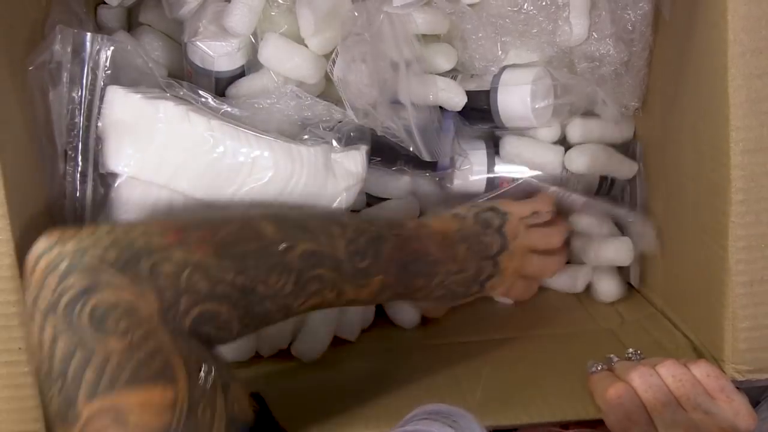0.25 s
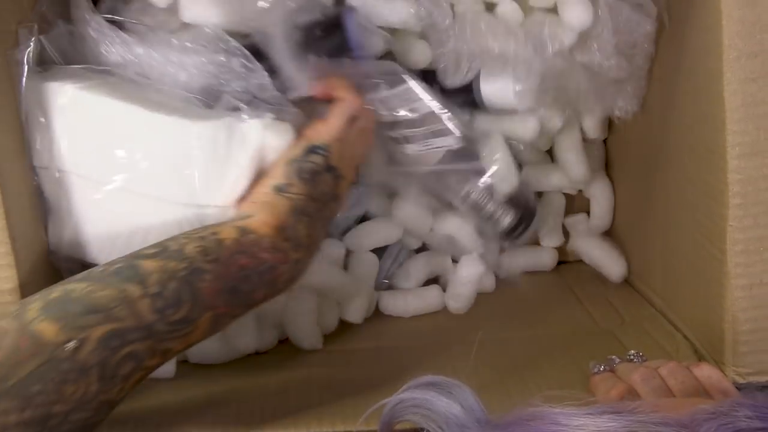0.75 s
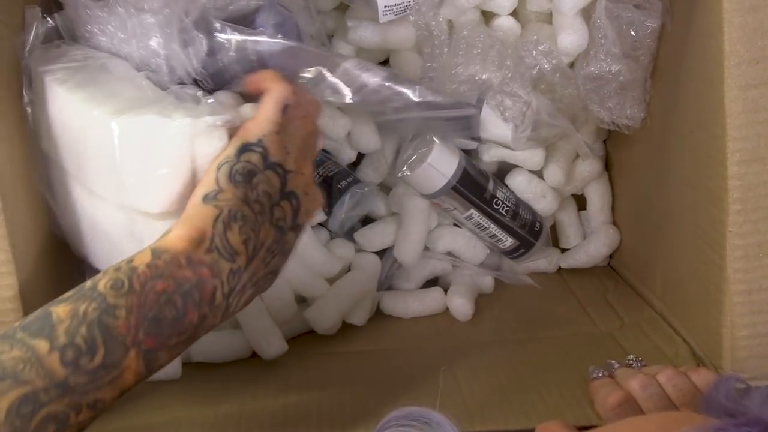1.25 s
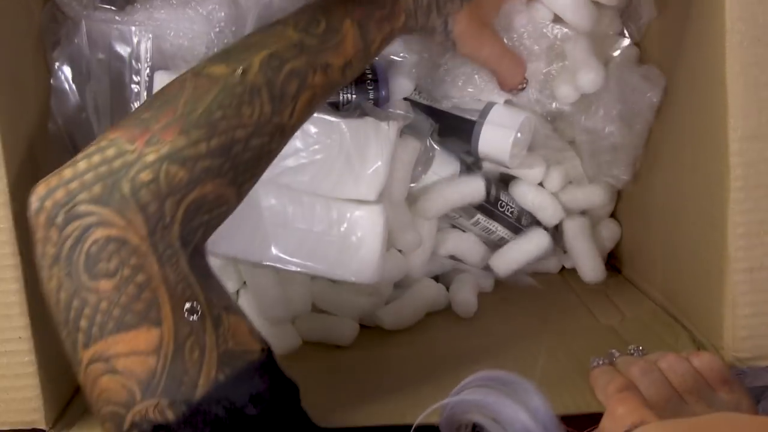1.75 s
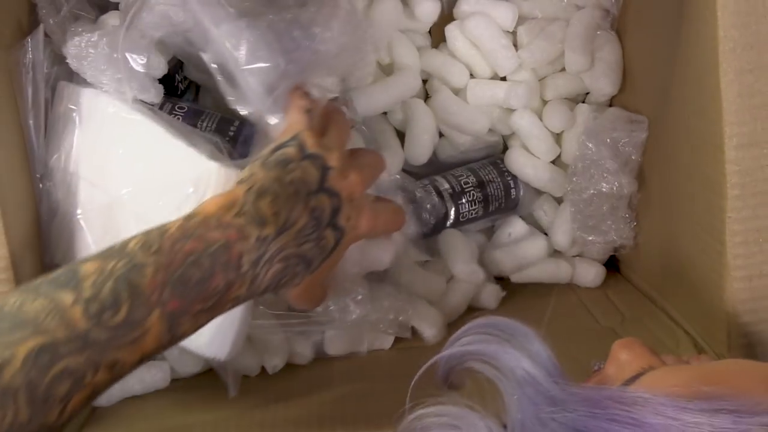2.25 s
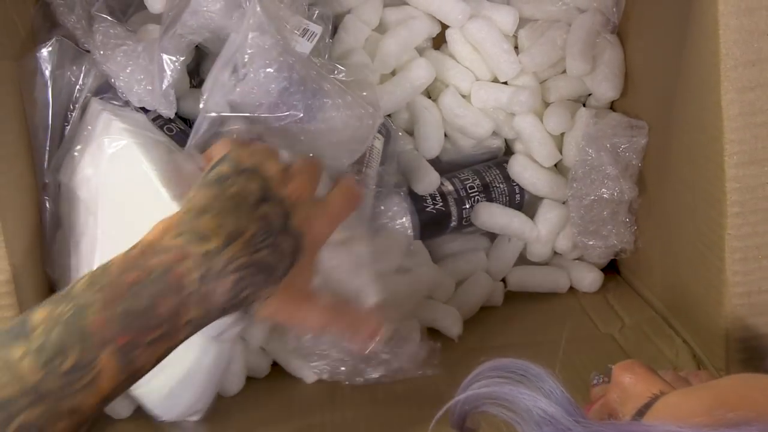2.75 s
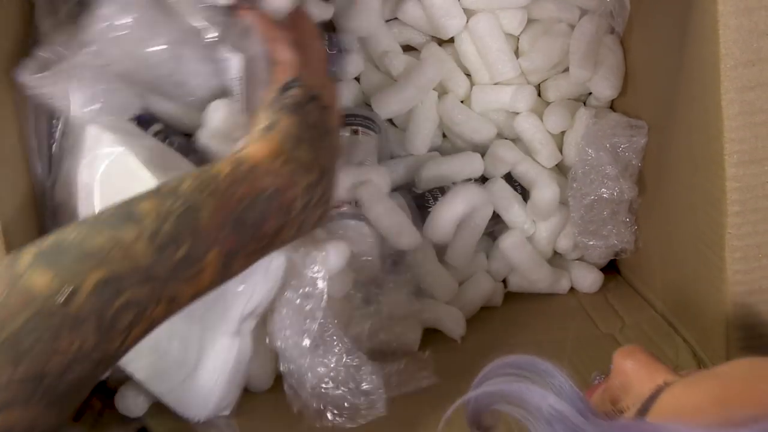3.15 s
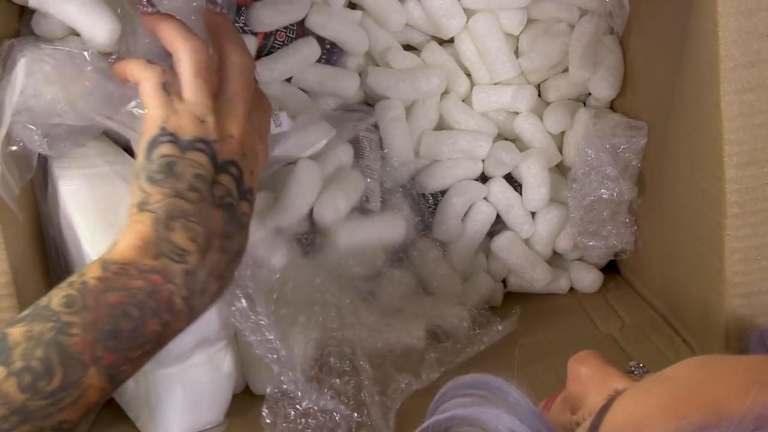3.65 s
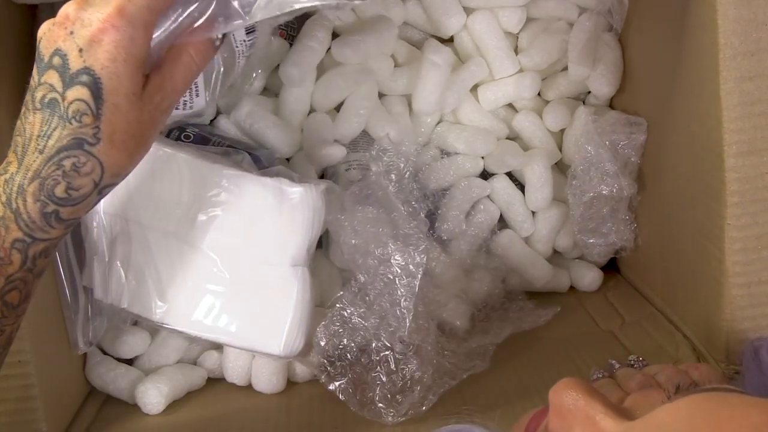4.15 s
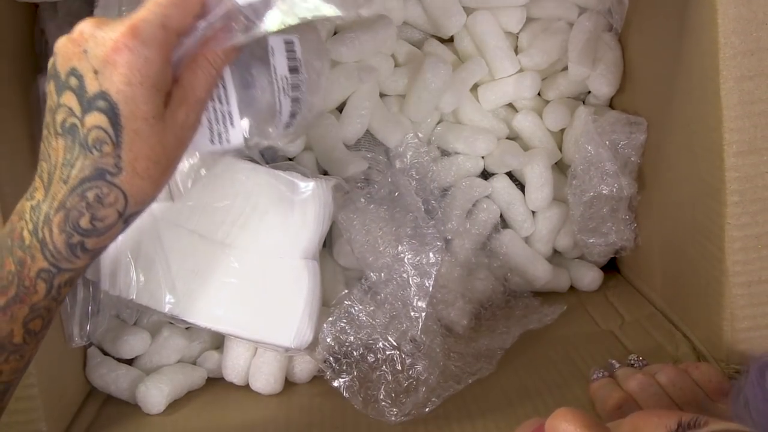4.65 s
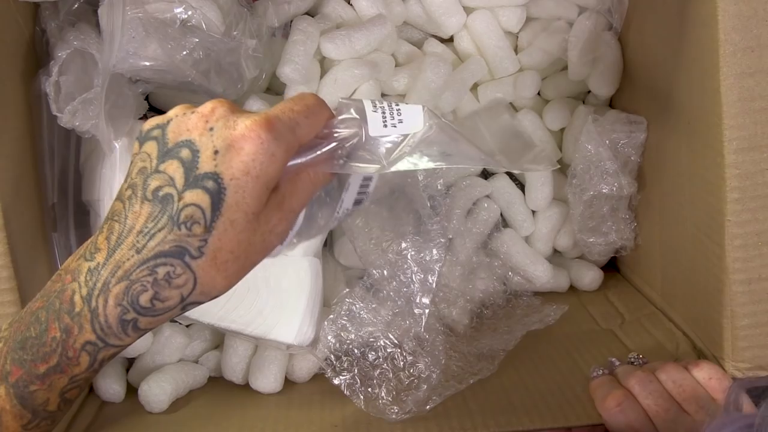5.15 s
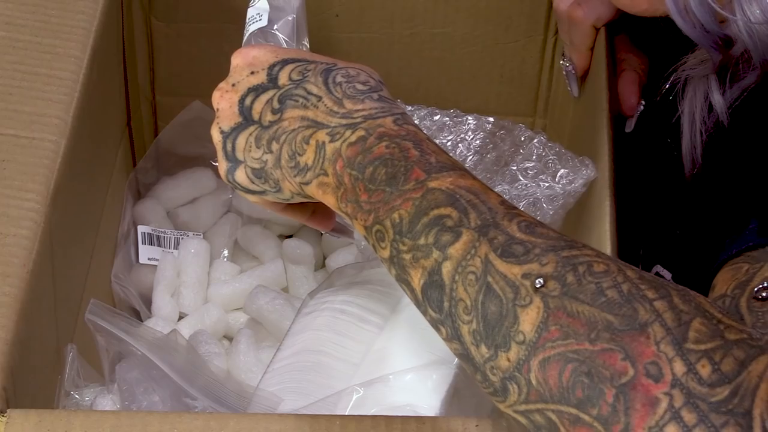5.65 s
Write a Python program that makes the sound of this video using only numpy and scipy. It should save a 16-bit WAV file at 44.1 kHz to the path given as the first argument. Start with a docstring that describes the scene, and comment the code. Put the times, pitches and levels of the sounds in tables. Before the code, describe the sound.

Close to the microphone, a plastic bag hisses briefly as it is dragged aside, then foam pieces rustle and tumble with a cardboard knock. A heavier multiple thump follows at about a second and a half, with low box rumble. Sharp film snaps continue, bunching densely past four seconds, before fading into a few faint crumples in a quiet room.

```python
"""A hand digs through a box of foam packing pieces, bubble wrap and plastic bags, close to the microphone.
First a bag is dragged aside with a fine hiss of rubbing contacts; then foam rustles in dense noise bursts,
film creases snap as sharp edges with ringing noise, and the box walls are knocked in low thud swings,
thickest around 1.6 s, while the box drums and sways. Near 4.9 s one bag is held up: its stiff folds crumple
in sparse ringing pops, and the sound dies away into a quiet, wavering room."""
import sys
import numpy as np
from scipy import signal
from scipy.fft import irfft
from scipy.io import wavfile
from scipy.ndimage import uniform_filter1d

SR = 44100
rng = np.random.default_rng(int(sys.argv[2]) if len(sys.argv) > 2 else 0)


def boost(x):
    """Linear amplitude factor 10**(x/20) for a level x in decibels (scalar or array-like)."""
    u = np.asarray(x, float) / 20
    return 10 ** u


def file_out(sig):
    """Save sig as 16-bit WAV at sys.argv[1]."""
    # one column per channel
    cols = np.atleast_2d(sig).T
    # limit, then scale
    lim = np.clip(cols, -1, 1)
    pcm = np.round(lim * 32767).astype(np.int16)
    wavfile.write(sys.argv[1], SR, pcm)


N = 260217  # samples, 5.9 s


def evened(x):
    """Scales to rms 1."""
    return x / np.sqrt(np.mean(x ** 2) + 1e-20)


def smooth_noise(samples):
    """Slow random wander of rms 1, averaged over this many samples."""
    return evened(uniform_filter1d(rng.standard_normal(N), samples))


def read(points, hz):
    """Reads a table over pitch on a log-frequency axis."""
    f, value = np.transpose(points)
    return np.interp(np.log(hz + 1), np.log(f + 1), value)


def add(mix, s, sound):
    """Mixes a sound in at a time."""
    part = mix[round(s * SR):][:len(sound)]
    part += sound[:len(part)]


def band(x, lo_hz, hi_hz):
    """Band-pass."""
    return signal.sosfilt(signal.butter(2, [lo_hz, hi_hz], "band", fs=SR, output="sos"), x)


def colour(x, points):
    """Filters x with the spectrum of a table."""
    hz = np.fft.rfftfreq(2048, 1 / SR)
    impulse = np.fft.fftshift(irfft(boost(read(points, hz))))
    return signal.oaconvolve(x, impulse, "same")


def patchy(x, patch_db, bins, frames):
    """Different pieces rub at different moments, so the colour drifts in patches."""
    z = signal.stft(x, nperseg=512)[2]
    field = rng.standard_normal(z.shape[::-1]).T
    field = uniform_filter1d(field, bins, axis=0)
    field = uniform_filter1d(field, frames, axis=1)
    return signal.istft(z * boost(patch_db * evened(field)), nperseg=512)[1][:N]


def ring(hz, t60, length):
    """A sine that dies by 60 dB in t60 seconds, cut off at length seconds."""
    t = np.arange(round(length * SR)) / SR
    return np.sin(2 * np.pi * hz * t) * boost(-60 * t / t60)


def contacts(per_s, spread_db, clump_db, clump_s, burst_s):
    """Noise in tiny bursts at random moments: many small, few large, bunched in clumps."""
    clumps = smooth_noise(max(round(clump_s * SR), 2))
    size = boost(spread_db * np.minimum(rng.exponential(1, N), 5) + clump_db * clumps)
    hits = size * (rng.random(N) < per_s / SR)
    fade = np.exp(-1 / (burst_s * SR))
    bursts = signal.lfilter([1], [1, -2 * fade, fade ** 2], hits)  # each contact swells, then fades
    return evened(bursts * rng.standard_normal(N))


def swells(rows, rise_s, fall_s):
    """Power of events that each swell to a peak and die away."""
    t = np.arange(0, N + 64, 64) / SR
    power = sum(boost(db) ** 2 * np.exp(np.minimum((t - s) / rise_s, (s - t) / fall_s)) for s, db in rows)
    return np.interp(np.arange(N) / SR, t, power)


def stir(material):
    """Gain per sample from the hand at work on "foam", "load" or "film"; foam and film surge in slumps."""
    # the hand at work: time_s, foam_rustle_db, load_on_walls_db, film_sliding_db
    hand = [(0, -47, -43, -45.5), (0.14, -48, -56, -49), (0.225, -47.5, -56, -53.5), (0.27, -47, -40, -61),
            (0.3, -29, -45, -48), (0.36, -35, -35, -55), (0.4, -36.5, -46, -53), (0.45, -29, -34.5, -50),
            (0.52, -34.5, -36, -56), (0.62, -37, -39.5, -49.5), (0.845, -32, -34, -44),
            (0.96, -43, -48, -55), (1.3, -45, -45, -53), (1.57, -44, -49, -53), (1.62, -39, -21, -44.5),
            (1.7, -30.5, -30, -44.5), (1.8, -38, -38.5, -50.5), (1.96, -33, -36, -51),
            (2.12, -36, -36, -46.5), (2.2, -34.5, -35.5, -39.5), (2.26, -39.5, -36.5, -47),
            (2.38, -44.5, -47, -53), (2.64, -41, -42, -51.5), (2.88, -46, -55, -52),
            (2.96, -44.5, -42.5, -51), (3.03, -37.5, -34, -45), (3.14, -38, -38, -44.5),
            (3.28, -36, -38.5, -45.5), (3.34, -43, -42, -49), (3.45, -43.5, -42, -48.5),
            (3.59, -48.5, -52, -52), (3.74, -42, -52, -48.5), (4.1, -47, -49, -52), (4.45, -55, -71.5, -59),
            (4.8, -55, -65, -62.5), (5, -65, -81, -65.5), (5.2, -51.5, -88, -68), (5.3, -70, -70.5, -88),
            (5.56, -75, -78, -90), (5.9, -74, -75.5, -90)]
    # heaps of filling that slump all at once: peak_s, foam_db, film_db
    slumps = [(0.291, -27, -45.5), (1.598, -33, -61), (1.66, -29, -51), (2.208, -30, -41),
              (3.065, -33, -53), (3.232, -37, -41), (3.499, -41, -51), (4.08, -43, -44.5),
              (4.901, -48, -51.5), (5.39, -58.5, -88), (5.49, -60, -89), (5.61, -63, -91), (5.74, -60, -88)]
    time_s, foam_db, load_db, film_db = np.transpose(hand)
    level_db = {"foam": foam_db, "load": load_db, "film": film_db}[material]
    steady = boost(np.interp(np.arange(N) / SR, time_s, level_db))
    if material == "load":
        return steady
    surges = [(s, surge_foam_db if material == "foam" else surge_film_db)
              for s, surge_foam_db, surge_film_db in slumps]
    return np.sqrt(steady ** 2 + swells(surges, rise_s=0.0077, fall_s=0.013))


def hush():
    """The quiet room under everything, wavering a little in level and colour."""
    # shape of the room noise: pitch_hz, relative_level_db (per Hz)
    floor_shape = [(24, -27), (40, 3.5), (257, -34.5), (335, -15), (685, -27.5), (790, -33.5), (1080, -18),
                   (1540, -34.5), (2200, -21), (2430, -25), (12000, -51), (15600, -73), (22000, -120)]
    waver = boost(2.8 * smooth_noise(1500))
    noise = patchy(colour(rng.standard_normal(N), floor_shape), patch_db=0.5, bins=4, frames=12)
    return boost(-79) * evened(waver * noise)


def room(x):
    """Sparse reflections of random sign from box and room, each band dying at its own speed."""
    # how long reflections last: pitch_hz, t60_s
    decay_times = [(200, 0.11), (1000, 0.38), (5000, 0.58), (14000, 0.21)]
    taps = np.zeros(SR // 2)
    at = np.arange(60, len(taps) - 20, 20)
    taps[at + rng.integers(0, 20, len(at))] = rng.choice([-1., 1.], len(at))
    hz, t, z = signal.stft(taps, SR, nperseg=256)
    t60 = np.maximum(read(decay_times, hz), .02)[:, None]
    tail = signal.istft(z * boost(-60 * t / t60), SR, nperseg=256)[1]
    return signal.oaconvolve(x, tail / np.linalg.norm(tail))[:N]


def walls():
    """The ring of the cardboard after one tap, with little deep bass."""
    # resonances of the cardboard box: pitch_hz, relative_level_db, t60_s
    modes = [(100.5, 4.5, 0.037), (184, -0.5, 0.043), (244, 5, 0.028), (313, 1.5, 0.045), (433, -9, 0.13),
             (576, -13, 0.017), (720, -15, 0.04)]
    return band(sum(boost(db) * ring(hz, t60, .3) for hz, db, t60 in modes), 79, 4000)


def box():
    """The shifting load drums on the walls and rocks the whole box."""
    # the box lurches on the floor: peak_s, peak_db
    lurches = [(.33, -37), (.53, -40), (.84, -45), (1.65, -45), (1.8, -26.5), (2.25, -33.5), (2.42, -39),
               (2.6, -35), (2.68, -34), (3.07, -41), (3.3, -39), (4.12, -54)]
    taps = contacts(per_s=730, spread_db=0.5, clump_db=2.5, clump_s=0.05, burst_s=.002)
    drum = signal.oaconvolve(taps, walls())[:N]
    sway = band(band(rng.standard_normal(N), 18, 36), 18, 36)
    load = stir("load")
    wander = boost(-19.5 + 8 * smooth_noise(4000))  # between lurches the sway follows the load
    rocking = np.sqrt((wander * load) ** 2 + swells(lurches, rise_s=0.0096, fall_s=0.014))
    return load * evened(drum) + rocking * evened(sway)


def knocks():
    """The wall swings out, back about as far, and settles; then the box rings on."""
    # thud swings of various pitches on the cardboard, several making up one heavy knock:
    # start_s, thud_peak_db, thud_hz, wall_ring_db (relative to the thud)
    thuds = [(.3, -11.5, 229, -13), (0.311, -39.5, 200, 21), (1.5935, -15.5, 1094, -42),
             (1.5937, -15, 533, -39), (1.5983, -10, 464, -17), (1.6062, -10, 269, -27),
             (1.6109, -8.5, 199, -16), (1.633, -21.5, 306, -4.5), (1.647, -40, 250, 2.5),
             (1.661, -32.5, 200, 14), (1.675, -9, 213.4, -20), (1.681, -19.5, 187, 7.5),
             (1.691, -21.5, 210, -6), (1.7, -17, 436, -20.5), (1.711, -22.5, 396, -4),
             (2.23, -23, 219, -15), (2.24, -31, 69.4, 7.5), (2.579, -21, 202, -37), (3.055, -27, 244, -1),
             (3.283, -25, 169, -2), (3.8, -30, 285, -33), (3.864, -43, 101, 3)]
    out = np.zeros(N)
    for s, db, hz, ring_db in thuds:
        turns = np.arange(round(6 * SR / hz)) * hz / SR
        thud = np.sin(2 * np.pi * turns) * turns * np.exp(-turns / 0.42)
        push = signal.windows.hann(max(round(SR / hz * 0.79), 4))  # lower thuds press longer
        tail = np.convolve(push, walls())
        add(out, s, boost(db) * thud / abs(thud).max())
        add(out, s, boost(db + ring_db) * tail / abs(tail).max())
    return out


def film():
    """Smooth plastic slides over foam with a fine hiss; the bag at the start has its own colour."""
    # sliding film: pitch_hz, relative_level_db (per Hz)
    film_shape = [(1200, -14), (3000, 6.5), (6000, 4.5), (8000, 1), (10000, -6), (13000, -7.5),
                  (16000, -13)]
    # a bag dragged aside before the first dig: pitch_hz, relative_level_db (per Hz)
    bag_shape = [(1470, -33), (2500, 0), (3010, -4), (4020, -7), (5110, 5.5), (6500, -1), (7650, 1),
                 (10800, -8), (11800, -3), (16000, -20)]
    bag_end_s = 0.34  # the first bag is dropped
    rub = contacts(per_s=4400, spread_db=5.5, clump_db=2.0, clump_s=0.026, burst_s=0.0009)
    bag, wrap = colour(rub, bag_shape), colour(rub, film_shape)
    bag = bag / np.std(band(bag, 6000, 15000))  # both equally loud in the treble
    wrap = wrap / np.std(band(wrap, 6000, 15000))
    return stir("film") * np.where(np.arange(N) / SR < bag_end_s, bag, wrap)


def crackle(count=16):
    """Small creases pop at random; each patch of film rings briefly on two pitches of its own."""
    clumps = smooth_noise(900)
    size = boost(2.1 * np.minimum(rng.exponential(1, N), 4) + 2.4 * clumps)
    size = size * (rng.random(N) < 350 / SR)  # pops per second
    patch, out = rng.integers(0, count, N), np.zeros(N)
    for k, hz in enumerate(np.geomspace(1500, 12000, count)):
        second_hz = min(hz * rng.uniform(0.63, 2.5), 15000)
        pop = ring(hz, 2.3 / hz, .01) + 0.48 * ring(second_hz, 5.9 / hz, .01)
        onset = np.minimum(np.arange(len(pop)) * hz / SR, 1)  # rises over one cycle
        tilt = boost(-3.0 * np.log2(hz / 4000)) * np.sqrt(hz)
        out += signal.oaconvolve(size * (patch == k), onset * tilt * pop)[:N]
    return boost(-7.5) * stir("film") * evened(out)  # film crackles as hard as it slides


def foam():
    """Light foam pieces scrape and tumble in dense soft contacts, with little deep bass."""
    # rustling foam: pitch_hz, relative_level_db (per Hz)
    foam_shape = [(180, -3), (300, -0.5), (1100, -5.5), (1360, -4), (1690, -8), (2210, -7), (4020, -15.5),
                  (7690, -23.5), (16000, -66)]
    scrape = contacts(per_s=3500, spread_db=0.5, clump_db=0.3, clump_s=0.035, burst_s=0.0011)
    x = patchy(colour(scrape, foam_shape), patch_db=1.0, bins=7, frames=6)
    x = band(band(x, 170, 18000), 170, 18000)
    return stir("foam") * x / np.std(band(x, 600, 5000))


def crumple(count=14):
    """The bag held in the hand: stiff folds pop in bunches, each ringing on a low pitch and one above it."""
    clumps = smooth_noise(1200)
    size = boost(4.0 * np.minimum(rng.exponential(1, N), 4) + 4.9 * clumps)
    size = size * (rng.random(N) < 450 / SR)  # pops per second
    patch, out = rng.integers(0, count, N), np.zeros(N)
    for k, hz in enumerate(np.geomspace(550, 5000, count)):
        pop = ring(hz, 21.0 / hz, .03) + 0.23 * ring(hz * rng.uniform(1.85, 2.75), 15.0 / hz, .03)
        tilt = boost(-1.5 * np.log2(hz / 1500)) * np.sqrt(hz)
        out += signal.oaconvolve(size * (patch == k), tilt * pop)[:N]
    return evened(out + boost(-6.0) * room(out))


def rustle():
    """Foam while the hand digs; as the bag leaves it, the foam steps back and the bag's crumple joins."""
    held_s, held_fade_s = 4.92, 0.23
    held = np.clip((np.arange(N) / SR - held_s) / held_fade_s, 0, 1)
    return boost(-7.0 * held) * foam() + boost(-3.0) * held * stir("foam") * crumple()


def creaks():
    """Quick uneven slips keep one narrow ring of the sheet sounding for a moment."""
    # stiff folds of the bag that creak on one pitch: start_s, peak_db, pitch_hz, slipping_s
    folds = [(1.105, -27.5, 1370, 0.0071), (4.405, -27, 4900, .02), (5.078, -45.5, 910, .025),
             (5.482, -44.5, 1386, 0.016), (5.489, -55, 3350, .008), (5.719, -47, 950, 0.013),
             (5.744, -49.5, 620, 0.0075)]
    out = np.zeros(N)
    slips = rng.standard_normal((len(folds), 4000))
    for (s, db, hz, length), slip in zip(folds, slips):
        hold = signal.windows.tukey(max(round(length * SR), 8), .6)
        sound = np.convolve(hold * slip[:len(hold)] ** 3, ring(hz, 16.0 / hz, .04))
        add(out, s, boost(db) * sound / abs(sound).max())
    return out


def snaps():
    """Each crease buckles with a sharp edge and rings the sheet low and high, amid a flutter of small creases."""
    # the clearest creases of plastic film:
    # snap_s, peak_db, low_ring_hz, high_ring_hz, high_share_db (relative to the low ring)
    creases = [(0.025, -30, 750, 3570, 1), (0.136, -26, 1380, 7150, -1), (0.182, -27, 2250, 5620, 2),
               (0.229, -30, 1330, 4970, -11), (0.252, -22.5, 870, 3490, -21), (0.61, -16, 1210, 3670, 2),
               (0.634, -24, 2150, 3360, -3), (0.754, -22, 890, 3430, -1), (0.772, -18, 1010, 3540, -3),
               (0.796, -19, 910, 3690, -3), (1.103, -23, 760, 3730, -7), (1.119, -21, 1630, 3460, -1),
               (1.158, -24, 1470, 3140, 1), (1.17, -29, 1650, 4370, 7), (1.244, -25, 1440, 5040, -3),
               (1.416, -33, 1500, 5930, -5), (1.447, -24, 2390, 3300, -20), (1.463, -24, 751, 5000, 13),
               (1.593, -21, 748, 3130, -1.5), (1.66, -13.5, 950, 4500, -6), (1.928, -17, 2350, 4040, -12.5),
               (1.994, -20, 1310, 3190, -5), (2.211, -17, 1970, 3730, -4), (2.367, -26, 1360, 3630, 12),
               (2.418, -19.5, 703, 3290, -11), (2.481, -25, 780, 4740, -15), (2.534, -14.5, 730, 5000, 4.5),
               (2.608, -26, 1860, 3310, -3), (2.63, -20.5, 730, 3860, -8), (2.647, -23, 821, 3530, 0),
               (2.708, -22.5, 1110, 3940, 3), (2.87, -23, 1320, 4660, 4), (2.931, -28, 1260, 3810, 8),
               (3.0, -18, 1170, 3270, 4), (3.061, -13, 1250, 3350, -2), (3.193, -26, 2230, 4770, -10),
               (3.503, -22.5, 1010, 3690, 6), (3.577, -26, 1320, 5350, 0), (3.666, -18.5, 2320, 3060, -1),
               (3.688, -23, 1970, 3300, -6), (3.702, -19, 2420, 3340, 4), (3.732, -36, 1000, 5680, -1),
               (3.822, -24, 824, 3400, -3), (3.832, -19.5, 2370, 3520, -1), (3.902, -24, 1340, 3670, -1),
               (3.91, -27, 1020, 3300, 1), (3.957, -25.5, 710, 5010, -1), (3.966, -25, 1080, 3100, 0),
               (4.06, -20.5, 1960, 3140, -3), (4.12, -24, 970, 7900, 13), (4.184, -25, 2000, 5460, -8),
               (4.193, -20.5, 2550, 3600, -3), (4.206, -24, 2060, 3650, -12),
               (4.251, -25.5, 1910, 3710, -3), (4.267, -27, 1340, 3960, 0), (4.295, -25, 2400, 5600, 0),
               (4.304, -21.5, 1100, 6500, 4), (4.319, -19.5, 2630, 7100, 6), (4.342, -23, 2400, 3400, 9),
               (4.36, -23, 2680, 5230, -3), (4.378, -25, 1310, 3410, -7), (4.383, -27, 1270, 4130, 0),
               (4.41, -18, 1720, 3700, 9), (4.445, -24.5, 1260, 3660, 6), (4.471, -24, 1760, 5260, 5),
               (4.482, -28, 736, 3530, 3.5), (4.523, -28.5, 2480, 4130, -9), (4.53, -19, 2730, 3440, 3),
               (4.546, -32, 1920, 3420, 2), (4.554, -24.5, 1420, 4670, 3), (4.637, -32.5, 2170, 4160, 5),
               (4.648, -42, 2470, 4530, 10), (4.67, -28.5, 1220, 4180, 3), (4.739, -30, 2200, 3350, -6),
               (4.765, -31.5, 1200, 3430, -7), (4.811, -38, 759, 4770, 5), (4.865, -32, 2150, 3650, -8),
               (4.892, -32, 1270, 6500, 4), (4.903, -25.5, 1280, 3500, 11), (4.94, -31.5, 764, 3600, -9),
               (5.01, -30, 2480, 6020, 5), (5.092, -29.5, 2560, 3020, 5), (5.119, -29.5, 1750, 3400, -12),
               (5.14, -31, 2470, 3700, 2), (5.184, -43, 2490, 3970, -17), (5.197, -35, 1820, 3900, -3),
               (5.239, -41.5, 1160, 3170, -9), (5.277, -42, 1350, 6120, 6), (5.29, -38.5, 1300, 4960, -0.5),
               (5.387, -51, 1740, 3250, -3), (5.394, -59, 1410, 3970, -15), (5.491, -49, 1390, 3200, -22),
               (5.508, -53, 2600, 3500, -5), (5.605, -51.5, 1670, 5440, -3), (5.724, -38.5, 953, 5530, 5.5),
               (5.743, -60, 713, 3200, -6), (5.821, -51, 1080, 5030, 1), (5.866, -45.5, 2630, 4840, 4)]
    flutter_level_db, flutter_spread_db = -18.5, 4  # smaller creases around each snap
    dull_from_s, dull_db_per_s = 4.1, -1.5  # snaps lose their top as the bag is carried away
    out, t = np.zeros(N), np.arange(-600, 2000) / SR
    before, after = np.minimum(t, 0), np.maximum(t, 0)
    noise = rng.standard_normal((len(creases), 3, len(t)))
    edge = np.exp(-(t / .00003) ** 2)
    burst = np.where(t < 0, .5 * np.exp(before / 0.000088), np.exp(-after / 0.00035))
    cloud = np.where(t < 0, np.exp(before / 0.0042), np.exp(-after / 0.017))
    for (s, db, low_hz, high_hz, high_db), (low_noise, high_noise, chance) in zip(creases, noise):
        crack = burst.copy()
        for gain, delay in chance[2:6].reshape(2, 2):  # a crease gives way in steps
            crack += 0.5 * abs(gain) * np.roll(burst, round(abs(delay) * 0.0023 * SR))
        flutter_db = flutter_level_db + flutter_spread_db * np.clip(chance[0], -1, 1)
        unevenness_db = 1.2 * evened(uniform_filter1d(chance, 40))
        shape = crack + boost(flutter_db + unevenness_db) * cloud
        sharp = (0.52 + 0.5 * abs(chance[6])) * edge
        low = shape * low_noise - 2.2 * sharp
        high = shape * high_noise - 9.0 * sharp
        low = band(low, low_hz / 1.25, low_hz * 1.25) + .5 * band(band(low, 400, 5000), 400, 5000)
        top = 0.49 * band(high, 6800, 11000) + 0.37 * band(high, 9900, 14000)
        top_db = 3.9 * chance[1] + dull_db_per_s * max(s - dull_from_s, 0)
        high = band(high, high_hz / 1.218, high_hz * 1.128) + boost(top_db) * top
        sound = low / abs(low).max() + boost(high_db) * high / abs(high).max()
        add(out, s - .0126, boost(db) * sound / abs(sound).max())  # flutter leads in before the edge
    return out


def scene():
    """Everything in the box, its reflections and the room."""
    near = snaps() + creaks() + film() + crackle() + rustle()
    return (near + boost(-18.0) * room(near) + knocks() + box() + hush())[None]


def top_cut(x):
    """Nothing passes above the cut-off."""
    return signal.sosfilt(signal.butter(12, 16820, fs=SR, output="sos"), x)


def record(dry):
    """Takes off everything above 16150 Hz and finishes the mix."""
    limited = signal.oaconvolve(dry, signal.firwin(255, 16150, fs=SR)[None], "same")
    return top_cut(limited)


dry = scene()
out = record(dry)
file_out(out)
```